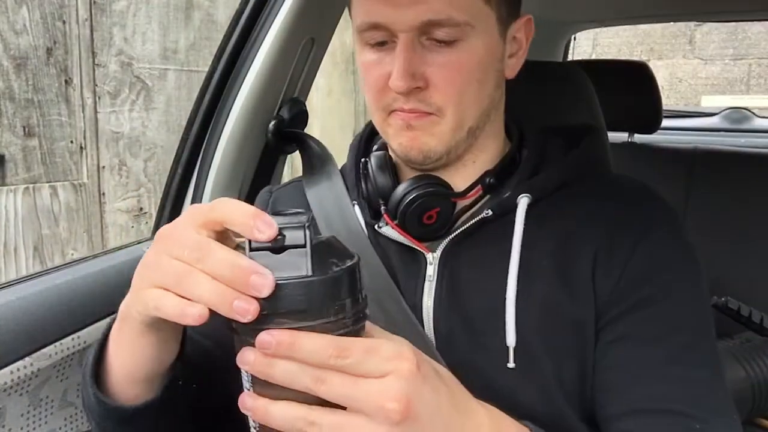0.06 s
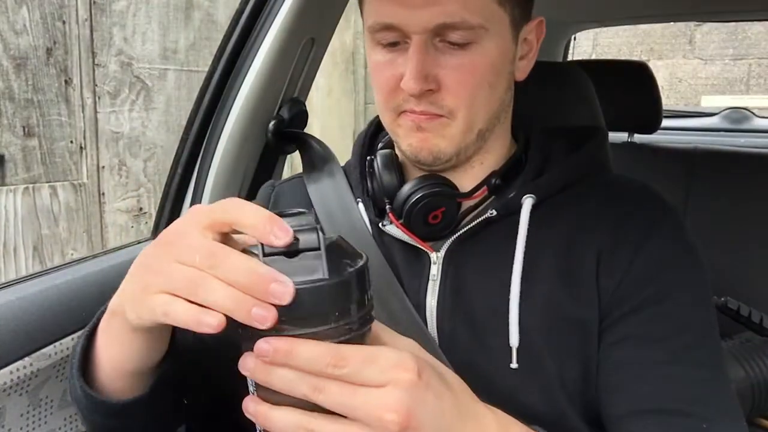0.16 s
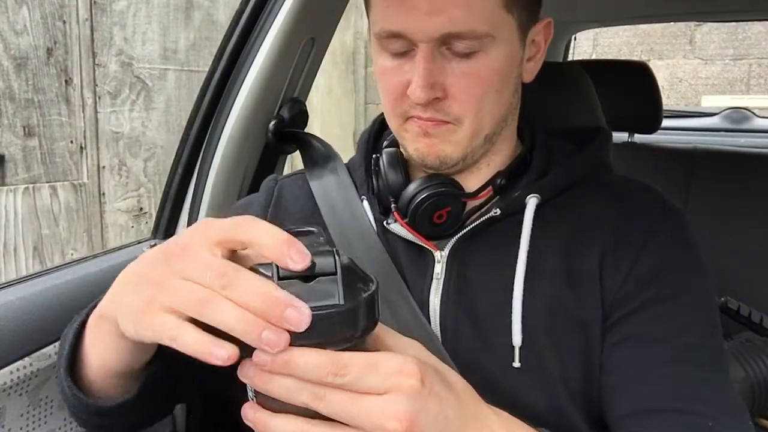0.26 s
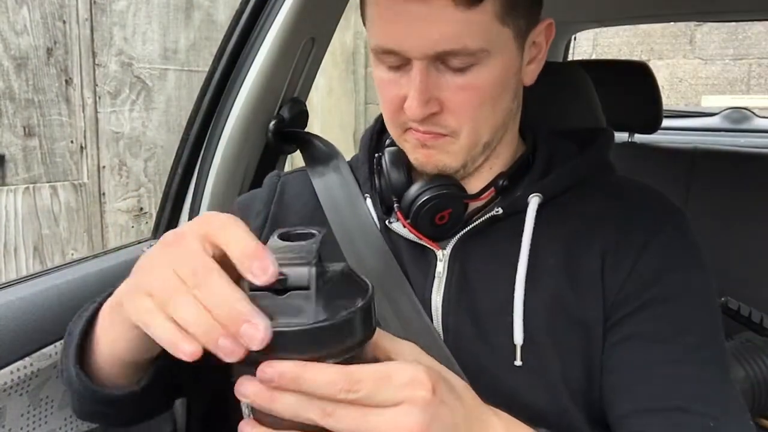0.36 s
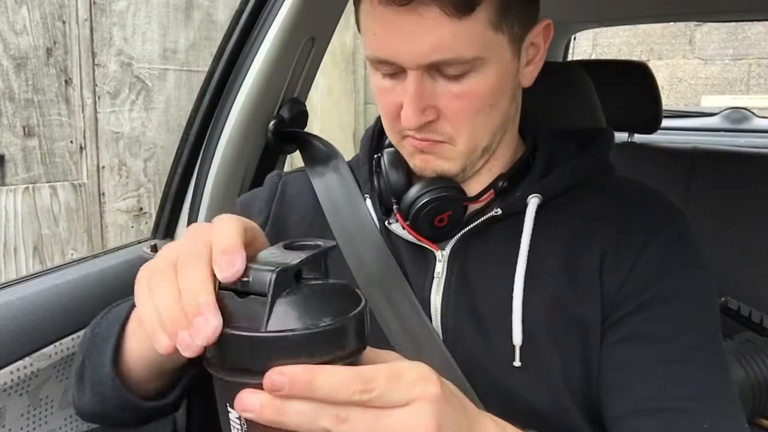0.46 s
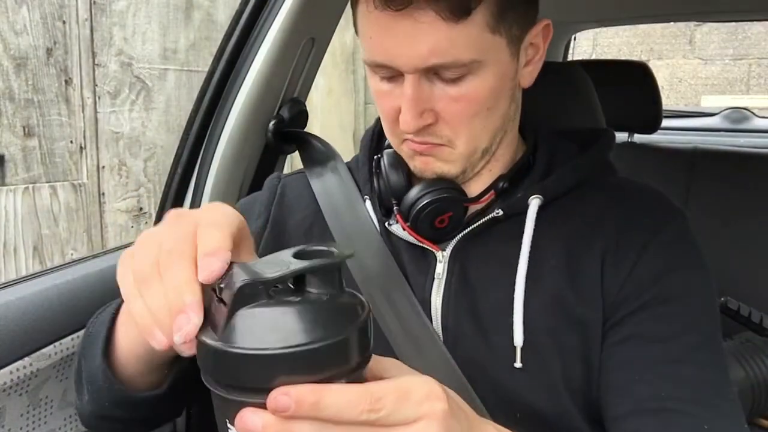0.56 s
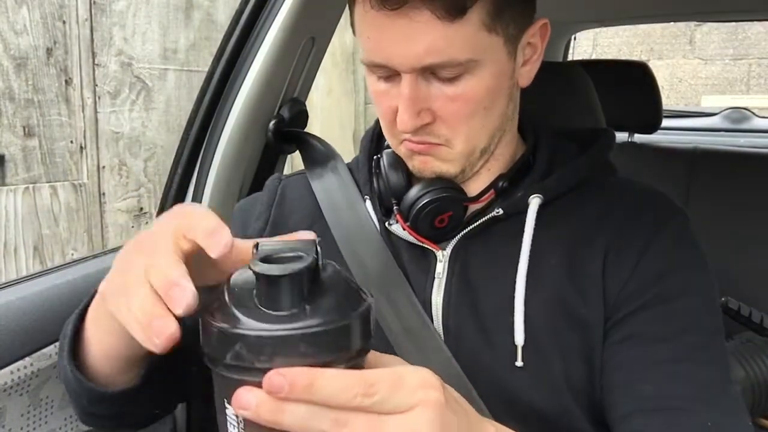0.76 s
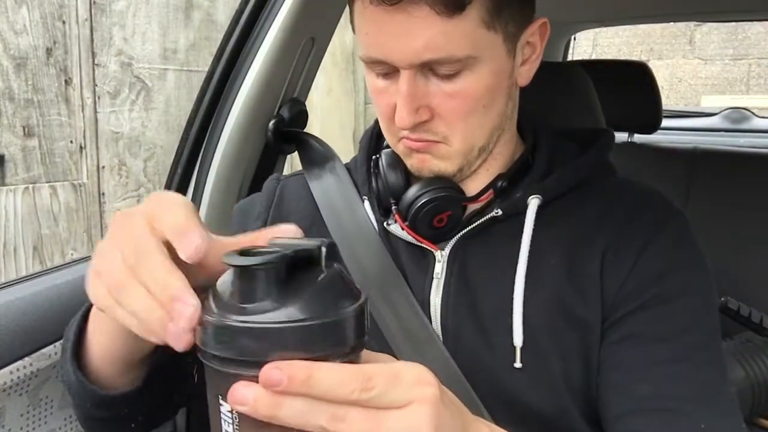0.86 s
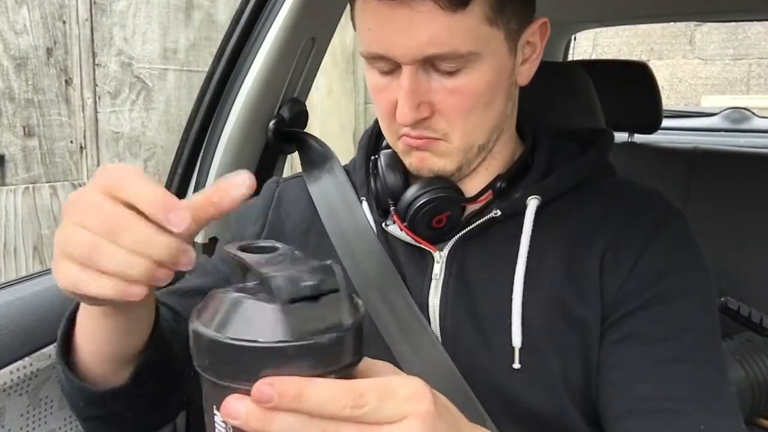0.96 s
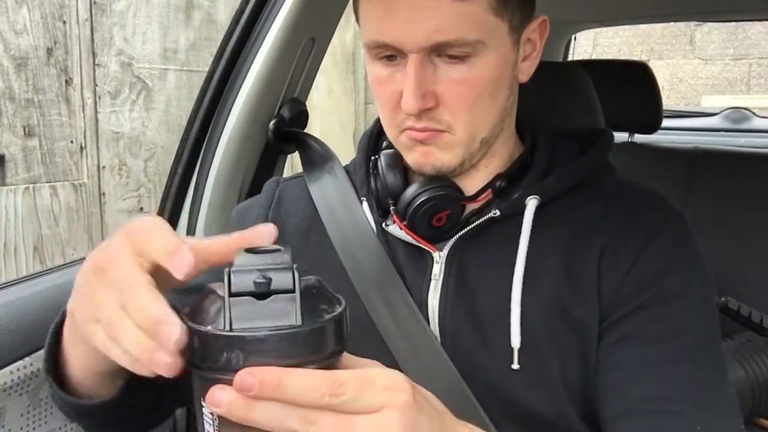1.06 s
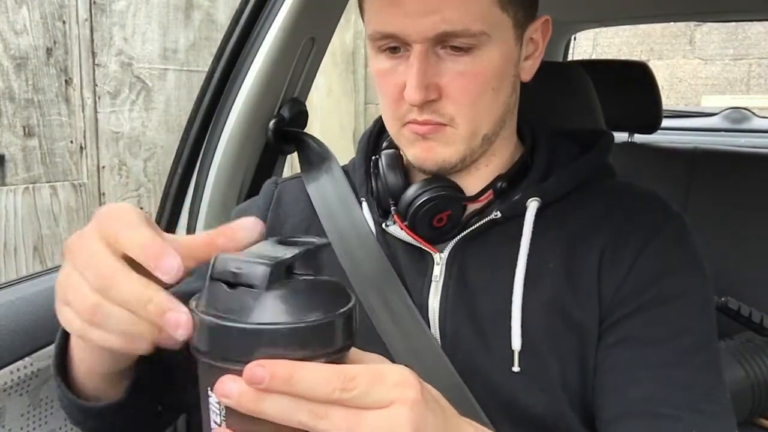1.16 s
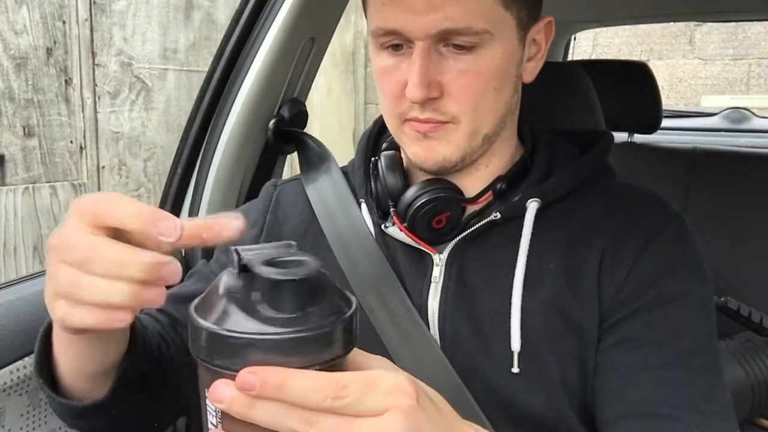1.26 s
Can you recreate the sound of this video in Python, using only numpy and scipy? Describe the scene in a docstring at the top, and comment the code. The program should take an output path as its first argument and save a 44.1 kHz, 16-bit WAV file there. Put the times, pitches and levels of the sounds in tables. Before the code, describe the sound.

Close up inside a small, dry car cabin, faint finger rubbing leads to a sharp plastic lid snap and a smaller clack, then scratchy handling and soft taps over a quiet low engine hum.

```python
"""Shaker bottle in a parked car

The flip cap of a plastic bottle creaks, snaps open and knocks once more: noise cracks plus ringing tones.
Fingers rub, scratch and tick over the plastic: tiny random clicks and soft noise bursts, filtered.
The hollow bottle thuds dully with low decaying tones, and a short tail follows the plastic sounds.
Behind it the idling engine hums with wavering sine tones over filtered noise."""
import sys
import numpy as np
from scipy import signal
from scipy.fft import rfft, irfft
from scipy.io import wavfile
from scipy.ndimage import uniform_filter1d

SR = 44100
rng = np.random.default_rng(int(sys.argv[2]) if len(sys.argv) > 2 else 0)


def persist_wave(psi):
    """Save psi, clipped to +-1, as 16-bit WAV."""
    counts = np.round(np.clip(psi, -1, 1) * 32767).astype(np.int16)
    wavfile.write(sys.argv[1], SR, np.atleast_2d(counts).T)


N = 57330  # samples, 1.3 s

# Decay times (T60) are the time to fall by 60 dB; burst() makes those of noise shorter.
# Snaps of the cap. Each row: start in seconds, then levels in dB of body, crack, treble,
# ring of the cap, ring of the cup.
CAP_SNAPS = [(0.2382, -34.5, -30, -55, -14.5, -34), (0.2412, -27.5, -23, -36, -13, -53),
             (0.2476, -16.5, -15, -20, -22, -26.5), (0.2521, -43, -24, -26.5, -23, -42),
             (0.2584, -10.5, -23, -21.5, -43, -21), (0.2603, -18, -22.5, -42, -16, -31),
             (.2754, -24.5, -25, -44, -43, -27.5)]
# Noise bands of a snap: body, crack, treble. Each row: lowest and highest frequency in Hz.
SNAP_NOISE_BANDS = [(450, 2500), (1900, 5320), (4700, 17000)]
# Decay settings of body, crack and treble noise, in seconds.
SNAP_NOISE_T60_S = [0.024, 0.035, 0.034]
# Tone colour of the snap noise. Each row: frequency in Hz, gain in dB.
SNAP_TONE = [(500, 1), (900, 2.5), (1350, 4.5), (1700, -0.5), (2750, -2), (4100, 1.5), (5000, -6),
             (6200, 2.5), (8000, -5.5), (12000, -6.5), (16000, -14)]
# Ringing of the flip cap. Each row: frequency in Hz, level in dB on top of the snap's, T60 in seconds.
CAP_RING = [(2455, 2.1, 0.038)]
# Ringing of the drinking cup (the bottle body), before random changes. Each row: frequency in Hz,
# level in dB on top of the snap's, T60 in seconds.
CUP_RING = [(684, 3, .06), (874, 1, .055), (1055, -1, .05), (1243, 2.5, .06), (1402, 2.5, .05),
            (1545, -3, .045), (1868, -1, .05), (3130, -6, .055), (3440, -2, .045), (3900, -1, .045)]
CUP_DETUNE, CUP_SCATTER_DB = .008, 1.2  # random spread: share of the frequency, level
# Ringing of the opened cap. Each row: frequency in Hz, level in dB on top of CLACK_DB, T60 in seconds.
CLACK_RING = [(1438, 0.5, 0.026), (1590, 3, 0.022), (2050, 0.5, 0.04), (2400, 4, 0.017), (2480, 0.5, 0.038),
              (3105, 1.5, 0.019), (3560, -6, 0.02), (4260, 1.5, 0.034)]
CLACK_S, CLACK_DB = .3776, -23  # the opened cap meets its stop

# Rubbing of skin on plastic. Each row: time in seconds, level in dB, extra treble in dB.
RUB_PATH = [(0, -74, -8), (.038, -60, -8), (0.045, -53, -1), (.098, -53, -3.5), (.12, -45.5, -4),
            (.14, -46, -2), (.195, -57.5, -11), (0.224, -43.5, -7), (.28, -37, 2), (.31, -50.5, -6),
            (.345, -56, 3), (.39, -48.5, 2), (0.427, -38, -2.5), (.455, -43.5, -2.5), (.49, -39, -4.5),
            (0.518, -47.5, 3), (0.538, -35, -3), (.578, -48.5, 2), (.605, -42, -2), (.63, -38.5, -2.5),
            (.678, -41.5, 10), (.73, -43.5, -0.5), (.78, -47, -3), (.82, -65, -1), (.85, -80, 7),
            (0.866, -45, 2.5), (0.894, -48, 1), (0.943, -41, 7), (.99, -45.5, 8.5), (1.013, -38, 2.5),
            (1.045, -43.5, 3.5), (1.085, -52, 3), (1.101, -41, -2.5), (1.115, -76, -8), (1.145, -77, -11),
            (1.17, -52.5, 4), (1.215, -41, 1.5), (1.237, -45.5, 2.5), (1.265, -49, 14.5), (1.3, -50, 11.5)]
# Tone colour of the rubbing. Each row: frequency in Hz, gain in dB.
RUB_TONE = [(400, -6), (950, -5), (1700, -3.5), (3000, 5.5), (4100, -0.5), (4800, -9.5), (6500, -2.5),
            (8200, -18), (12000, -15), (16000, -19.5)]
# Frequencies the rubbed plastic favours. Each row: centre in Hz, width in Hz, relative level in dB.
RUB_RINGS = [(1924, 200, 2), (2450, 93, 9), (3295, 110, 2), (4040, 137, 5), (5750, 290, -4),
             (6940, 270, -8.5)]
RUB_RING_DB = 2.5  # rings against the coloured rubbing
RUB_FLUTTER_DB, TREBLE_HZ = 1, 5300  # size of the level wander; where the extra treble starts
SLIPS_PER_S, SLIP_SCATTER_DB = 2300, 2  # average rate and uneven size of the tiny clicks
CRACKLES_PER_S, CRACKLE_T60_S, CRACKLE_DB = 350, .006, -6  # level is against the rest of the rubbing
CRACKLE_LOW_HZ, CRACKLE_HIGH_HZ, CRACKLE_TILT_DB = 2080, 8040, -4.5  # tilt per octave

# Brief scratches where a finger catches. Each row: start in seconds, length in seconds, centre in Hz,
# level in dB.
FINGER_SCRATCHES = [(0.116, 0.012, 4030, -44), (0.137, 0.011, 1590, -44.5), (0.22, 0.041, 1480, -39),
                    (0.613, 0.01, 3930, -40.5), (0.62, 0.02, 2730, -39.5), (0.632, 0.056, 3830, -40.5),
                    (0.733, 0.019, 2600, -42.5), (0.919, 0.019, 3340, -42), (0.942, 0.012, 3970, -37.5),
                    (0.975, 0.015, 3230, -42), (0.999, 0.0087, 2400, -38), (0.996, 0.037, 5300, -43)]
SCRATCH_WIDTH = 0.098  # share of the centre frequency

# Ticks of fingers and nails on the plastic; the one at 0.3772 s is the crack of the cap's clack.
# Each row: start in seconds, level in dB, centre of the ring in Hz.
PLASTIC_TICKS = [(.041, -49, 2600), (.108, -40.5, 3720), (0.127, -40, 6360), (.130, -35, 1400),
                 (0.2025, -47, 3460), (0.3772, -27, 3900), (0.495, -35, 2830), (.503, -35.5, 1580),
                 (.528, -27.5, 2000), (.552, -35.5, 1670), (0.681, -31.5, 4030), (.698, -31.5, 2650),
                 (0.7352, -34.5, 2660), (0.748, -45.5, 2750), (.834, -47, 2620), (.863, -40, 2500),
                 (.922, -40, 5800), (.944, -38.5, 7400), (1.001, -32, 5300), (1.06, -46, 2900),
                 (1.1513, -41.5, 6200), (1.276, -39, 4070), (1.28, -36, 2270)]
# Tone colour of the ticks. Each row: frequency in Hz, gain in dB.
TICK_TONE = [(300, 3.5), (950, -2.5), (1500, 4), (4000, 2), (5000, -5.5), (6200, 0), (8500, -10),
             (16000, -17)]
TICK_T60_S, TICK_ATTACK_S = 0.031, .0012
TICK_FOCUS_DB, TICK_FOCUS_OCTAVES = 7, .35  # boost around the centre and its spread

# Dull thuds of the hollow bottle, under the cap's snaps and from the hand. Each row: start in seconds,
# boom level in dB, knock level in dB, all before the deepest bass is cut.
BOTTLE_THUDS = [(.11, -56, -38), (0.2504, -16, -19.5), (.259, -13.5, -36), (0.2753, -13.5, -46),
                (0.3788, -38, -20.5), (.624, -34, -44.5), (0.699, -31, -46), (0.714, -31, -43),
                (.870, -30, -48), (0.899, -40.5, -62), (.996, -57, -34.5), (1.103, -37.5, -32),
                (1.153, -48, -40.5), (1.282, -39, -34.5)]
# Boom of the bottle. Each row: frequency in Hz, level in dB on top of the thud's, T60 in seconds.
BOOM_RING = [(132.5, -5, 0.13), (181.7, 0.5, 0.069), (224, -15.5, 0.028)]
# Knock of the bottle. Each row: frequency in Hz, level in dB on top of the thud's, T60 in seconds.
KNOCK_RING = [(208, 3, 0.031), (290, -7, 0.062), (463, -2, 0.036), (648, -7.5, 0.068)]
# Dull noise in each thud: level against the knock, decay setting, band in Hz.
THUMP_DB, THUMP_T60_S, THUMP_BAND_HZ = -11, .045, (180, 650)
THUD_LOW_HZ = 98

CABIN_T60_S, CABIN_DB, CABIN_DELAY_S = 0.1, -15.5, .004

# Hum of the idling engine, before it wavers. Each row: frequency in Hz, level in dB.
IDLE_HUM = [(27, -48), (53.9, -38), (108, -45), (135, -48.5), (231.5, -53.5)]
IDLE_WAVER_DB, IDLE_DRIFT = -1.34, 0.0076  # random wander of level, and of pitch as a share
# Tone colour of the low rumble. Each row: frequency in Hz, gain in dB.
RUMBLE_TONE = [(15, -21), (40, 1.5), (80, -7.5), (130, -11.5), (240, -15), (400, -23.5), (650, -24.5),
               (1000, -35), (6000, -47), (16000, -63)]
RUMBLE_DB = -42.5
TOP_HZ = 15800


def undb(db):
    """Turn decibels into a plain factor."""
    return 10 ** (np.asarray(db) / 20)


def unit(x):
    """Scale to an rms (average strength) of one."""
    return x / np.sqrt(np.mean(x ** 2))


def add(out, s, x):
    """Mix x into out from time s on."""
    i = int(np.clip(s * SR, 0, N - 1))
    out[i:i + len(x)] += x[:N - i]


def colour(x, points):
    """Filter x to follow (Hz, dB) points; the filter never answers ahead of its input."""
    size = 4096
    hz, db = np.array(points, float).T
    bins_hz = np.arange(size // 2 + 1) * SR / size
    gain = undb(np.interp(np.log(bins_hz + 1), np.log(hz), db))
    # Folding the cepstrum moves the filter's energy to its start (minimum phase).
    cepstrum = irfft(np.log(gain))
    cepstrum[1:size // 2] *= 2
    cepstrum[size // 2 + 1:] = 0
    response = irfft(np.exp(rfft(cepstrum)))
    return signal.fftconvolve(x, response)[:len(x)]


def band(x, lo, hi, order=2):
    """Keep mainly the sound between two frequencies."""
    edges = [lo, min(hi, SR / 2 - 1)]
    return signal.sosfilt(signal.butter(order, edges, "bandpass", fs=SR, output="sos"), x)


def highpass(hz):
    """Make a filter that weakens everything below hz."""
    return signal.butter(2, hz, "highpass", fs=SR, output="sos")


def fade(t60):
    """A quarter second of exponential decay, falling 60 dB in t60 seconds."""
    return np.exp(-np.log(1000) * np.arange(SR // 4) / SR / t60)


def ring(modes, alternate=False):
    """Struck tones dying away; neighbouring modes of a shell may swing in opposite directions."""
    t = np.arange(SR // 4) / SR
    total = np.zeros(len(t))
    for k, (hz, db, t60) in enumerate(modes):
        sign = (-1) ** (k * alternate)
        total += sign * undb(db) * np.sin(2 * np.pi * hz * t) * fade(t60)
    return total


def burst(t60):
    """A crack of noise with a fairly even spectrum, dying away."""
    x = rng.standard_normal(SR // 4) * fade(t60)
    spectrum = rfft(x, 2 * len(x))
    power = np.abs(spectrum) ** 2
    evened = irfft(spectrum / np.sqrt(power + .2 * power.mean()))[:len(x)]
    return evened * fade(3 * t60)


def blow(x, db):
    """Give a short sound the energy of 5 ms at this level."""
    return x * undb(db) * np.sqrt(.005 * SR / np.sum(x ** 2))


def walk(rate):
    """Random wander, with about rate new targets a second and a spread near one."""
    k = int(SR / rate)
    steps = np.repeat(rng.standard_normal(N // k + 1), k)
    return uniform_filter1d(steps, k)[:N]


def cap():
    """The catch slips and snaps, cracking and ringing cap and cup; then the open cap clacks on its stop."""
    out = np.zeros(N)
    for s, body_db, crack_db, treble_db, cap_db, cup_db in CAP_SNAPS:
        noise_db = (body_db, crack_db, treble_db)
        for (lo, hi), t60, db in zip(SNAP_NOISE_BANDS, SNAP_NOISE_T60_S, noise_db):
            crack = colour(band(burst(t60), lo, hi), SNAP_TONE)
            add(out, s, blow(crack, db))
        cup = []
        for hz, db, t60 in CUP_RING:
            detune, scatter = rng.standard_normal(2)
            cup.append((hz * (1 + CUP_DETUNE * detune), db + CUP_SCATTER_DB * scatter, t60))
        add(out, s, undb(cap_db) * ring(CAP_RING))
        add(out, s, undb(cup_db) * ring(cup, alternate=True))
    add(out, CLACK_S, undb(CLACK_DB) * ring(CLACK_RING, alternate=True))
    return out


def slips():
    """Skin sticks and slips on plastic: dense tiny clicks of uneven size and random direction."""
    size = undb(SLIP_SCATTER_DB * np.minimum(rng.exponential(size=N), 4))
    happens = rng.random(N) < SLIPS_PER_S / SR
    return happens * rng.choice([-1., 1.], N) * size


def crackles():
    """Larger slips stand out as tiny pings, each at its own pitch."""
    out = np.zeros(N)
    span = np.log2(CRACKLE_HIGH_HZ / CRACKLE_LOW_HZ)  # octaves
    for when, pitch, size in rng.random((int(CRACKLES_PER_S * N / SR), 3)):
        octaves = pitch * span
        mode = (CRACKLE_LOW_HZ * 2 ** octaves, CRACKLE_TILT_DB * octaves, CRACKLE_T60_S)
        add(out, when * N / SR, size ** 2 * ring([mode]))
    return unit(band(out, CRACKLE_LOW_HZ, CRACKLE_HIGH_HZ))


def rubbing():
    """Sliding fingers excite the plastic with tiny slips; loudness and brightness change along the strokes."""
    t = np.arange(N) / SR
    s, db, treble_db = np.array(RUB_PATH).T
    grains = slips()
    rings = np.zeros(N)
    for hz, width, level in RUB_RINGS:
        rings += undb(level) * band(grains, hz - width / 2, hz + width / 2, order=1)
    hiss = unit(colour(band(grains, 260, 27000), RUB_TONE))  # band() limits the upper edge
    x = unit(hiss + undb(RUB_RING_DB) * unit(rings))
    x = unit(x + undb(CRACKLE_DB) * crackles())
    # Forward and backward filtering keeps the treble in step with x.
    treble = signal.sosfiltfilt(highpass(TREBLE_HZ), x)
    x = x + (undb(np.interp(t, s, treble_db)) - 1) * treble
    return x * undb(np.interp(t, s, db) + RUB_FLUTTER_DB * walk(120))


def scratches():
    """A catching finger rasps briefly: tiny slips heard in one narrow band."""
    out, grains = np.zeros(N), slips()
    for s, length, hz, db in FINGER_SCRATCHES:
        i, n = int(s * SR), int(length * SR)
        lo, hi = hz * (1 - SCRATCH_WIDTH / 2), hz * (1 + SCRATCH_WIDTH / 2)
        rasp = band(grains, lo, hi, order=1)[i:i + n]
        soft_ends = signal.windows.tukey(len(rasp), .5)
        add(out, s, undb(db) * unit(rasp * soft_ends))
    return out


def ticks():
    """Short contacts on the plastic, with a softened start; each is boosted around its own frequency."""
    out = np.zeros(N)
    hz, level = np.array(TICK_TONE).T
    grid = np.geomspace(hz[0], hz[-1], 64)
    plastic_db = np.interp(np.log(grid), np.log(hz), level)
    attack = 1 - np.exp(-np.arange(SR // 4) / SR / TICK_ATTACK_S)
    for s, db, centre in PLASTIC_TICKS:
        distance = np.log2(grid / centre) / TICK_FOCUS_OCTAVES
        tone = plastic_db + TICK_FOCUS_DB * np.exp(-.5 * distance ** 2)
        tick = colour(attack * burst(TICK_T60_S), list(zip(grid, tone)))
        add(out, s, blow(tick, db))
    return out


def thuds():
    """Cap snaps and the hand make the bottle thump, knock and boom; it is too small to radiate deep bass."""
    out = np.zeros(N)
    for s, boom_db, knock_db in BOTTLE_THUDS:
        add(out, s, -undb(boom_db) * ring(BOOM_RING))
        add(out, s, -undb(knock_db) * ring(KNOCK_RING))
        thump = band(burst(THUMP_T60_S), *THUMP_BAND_HZ, order=4)
        add(out, s, blow(thump, knock_db + THUMP_DB))
    return signal.sosfilt(highpass(THUD_LOW_HZ), out)


def cabin(x):
    """Close, padded walls return a short, dull tail, made by smearing x with fading noise."""
    tail = band(burst(CABIN_T60_S), 140, 9400, order=1)
    tail = tail / np.sqrt(np.sum(tail ** 2))
    out = x.copy()
    add(out, CABIN_DELAY_S, undb(CABIN_DB) * signal.fftconvolve(x, tail))
    return out


def engine():
    """The idle hums through the car body as wavering tones, over a low rumble of filtered noise."""
    clock = np.cumsum(1 + IDLE_DRIFT * walk(4.97)) / SR  # all tones drift together
    hum = np.zeros(N)
    for hz, db in IDLE_HUM:
        level = np.sqrt(2) * undb(db + IDLE_WAVER_DB * walk(8.7))  # root of 2: rms to peak
        hum += level * np.sin(2 * np.pi * (hz * clock + rng.random()))
    rumble = unit(colour(rng.standard_normal(N), RUMBLE_TONE))
    return hum + undb(RUMBLE_DB) * rumble


def scene():
    """The plastic sounds with their cabin tail, plus dry thuds and the idling engine."""
    plastic = cap() + rubbing() + scratches() + ticks()
    return (cabin(plastic) + thuds() + engine())[None]


def record(dry):
    """Peaks beyond full scale are clipped, then the highest treble is cut."""
    top_cut = signal.ellip(10, .2, 80, TOP_HZ, fs=SR, output="sos")
    return signal.sosfilt(top_cut, np.clip(dry, -1, 1))


dry = scene()
out = record(dry)
persist_wave(out)
```